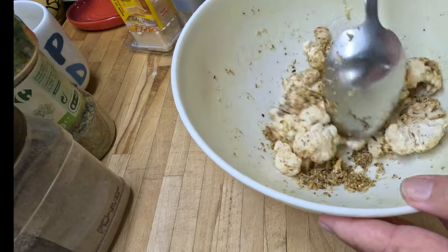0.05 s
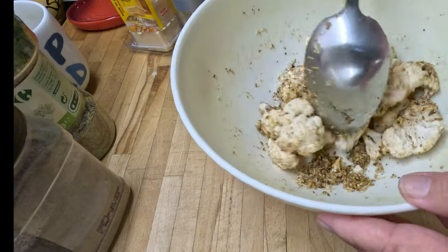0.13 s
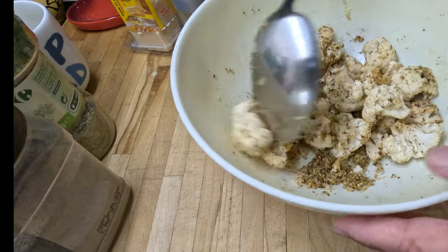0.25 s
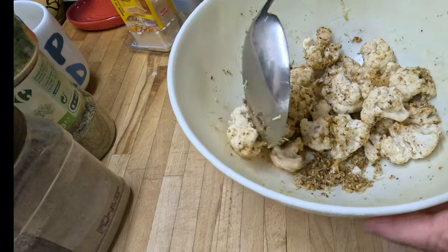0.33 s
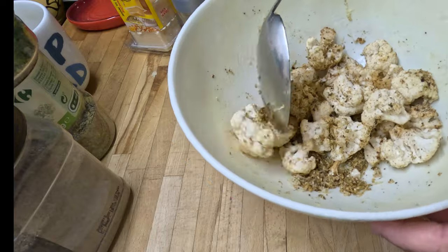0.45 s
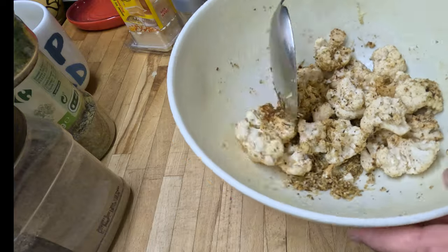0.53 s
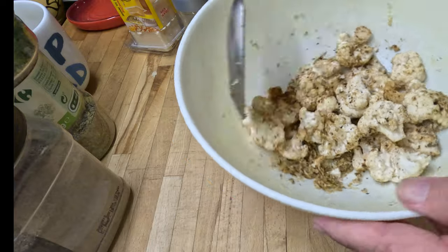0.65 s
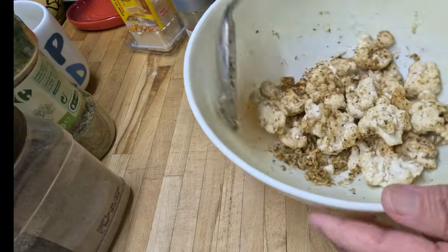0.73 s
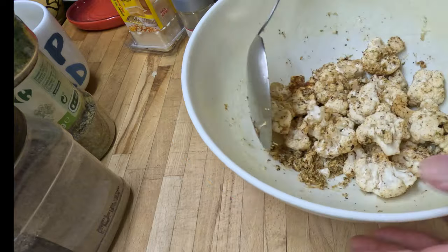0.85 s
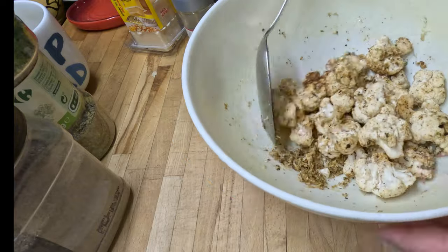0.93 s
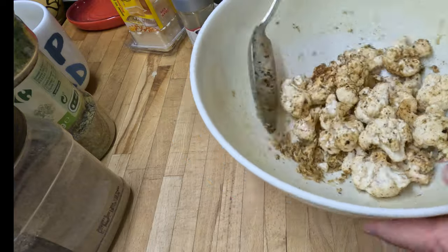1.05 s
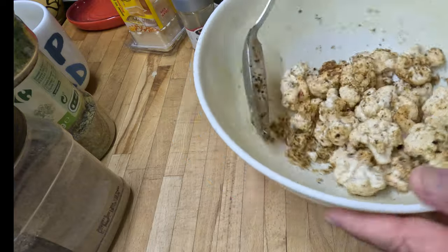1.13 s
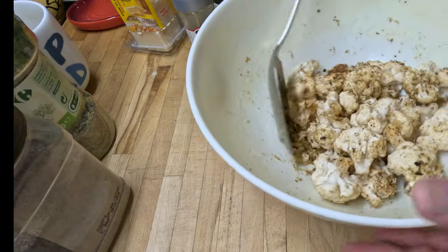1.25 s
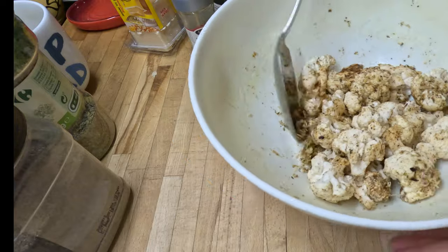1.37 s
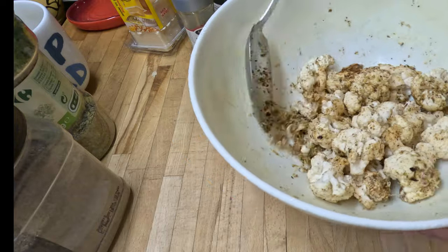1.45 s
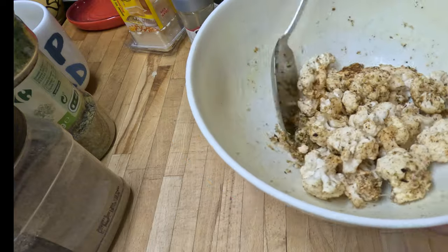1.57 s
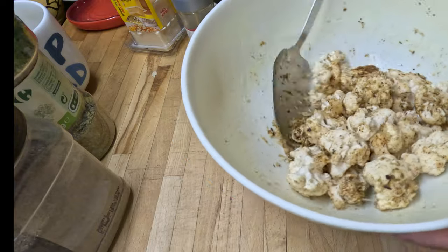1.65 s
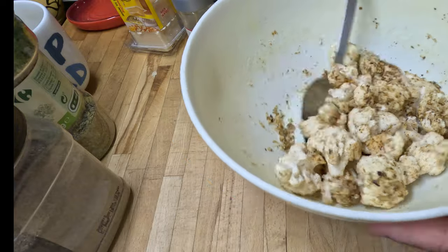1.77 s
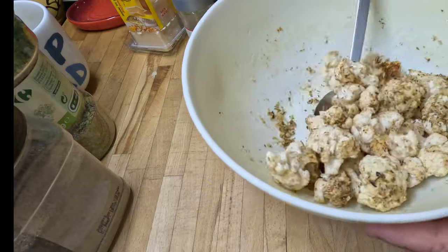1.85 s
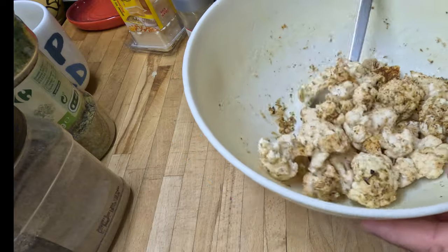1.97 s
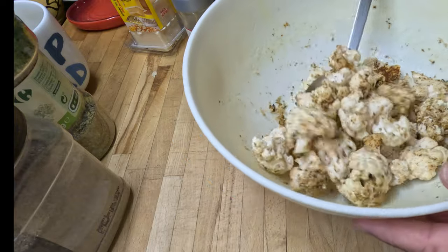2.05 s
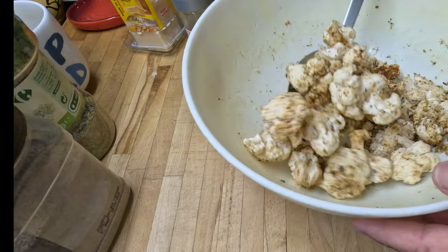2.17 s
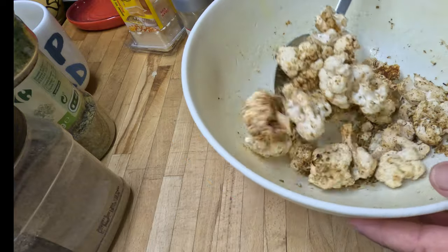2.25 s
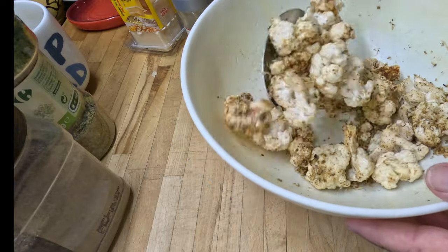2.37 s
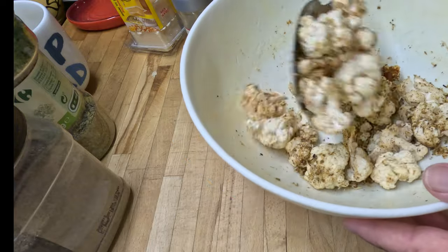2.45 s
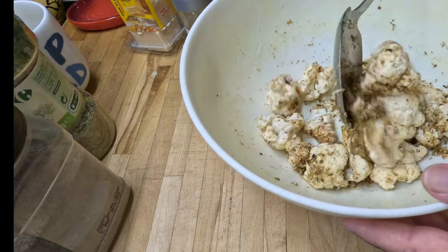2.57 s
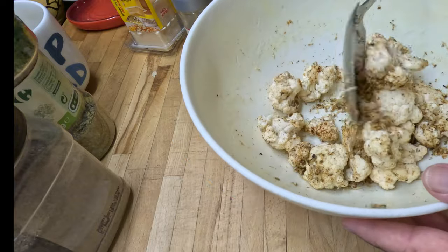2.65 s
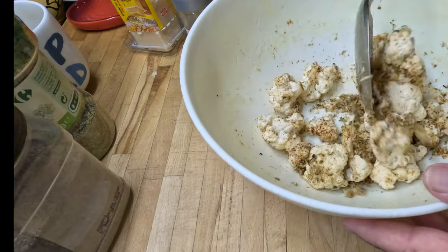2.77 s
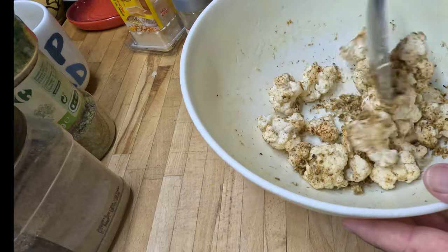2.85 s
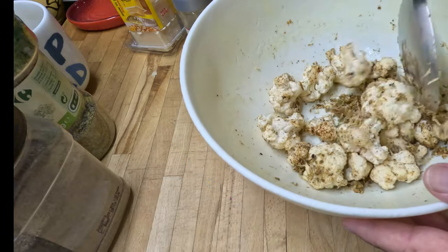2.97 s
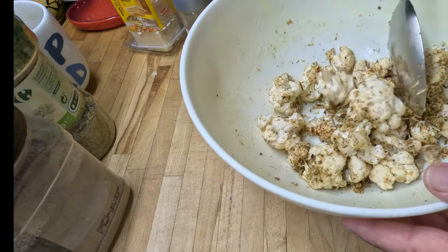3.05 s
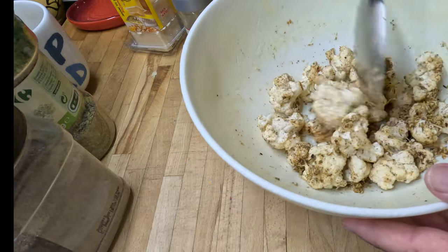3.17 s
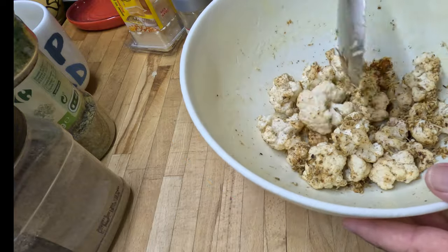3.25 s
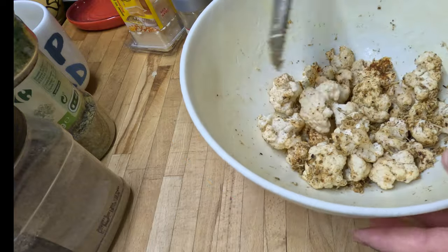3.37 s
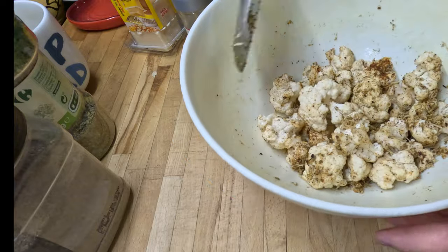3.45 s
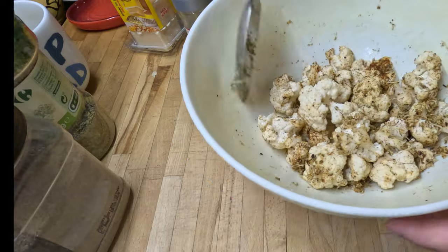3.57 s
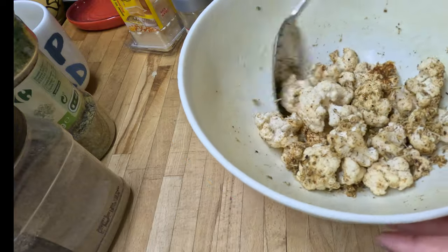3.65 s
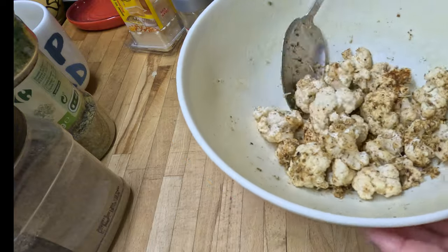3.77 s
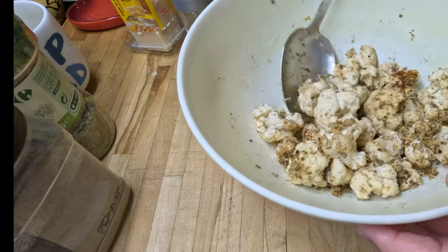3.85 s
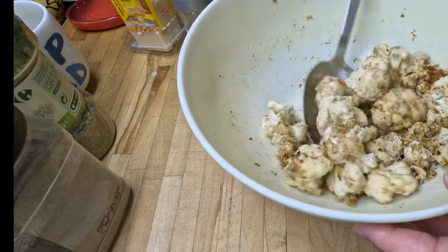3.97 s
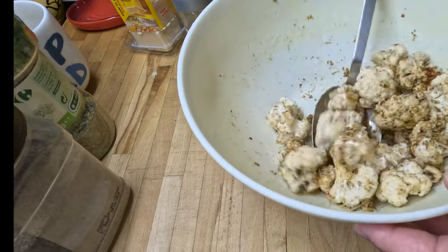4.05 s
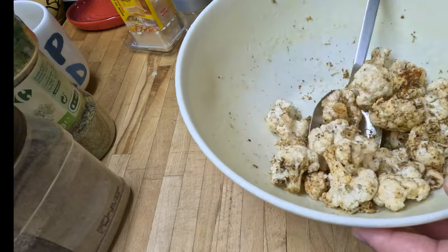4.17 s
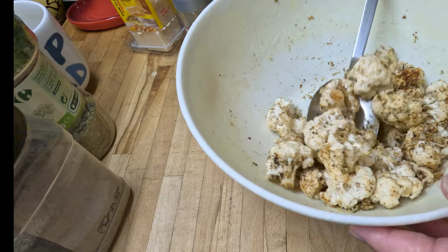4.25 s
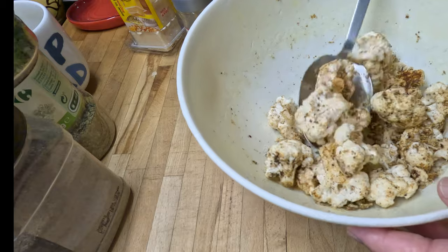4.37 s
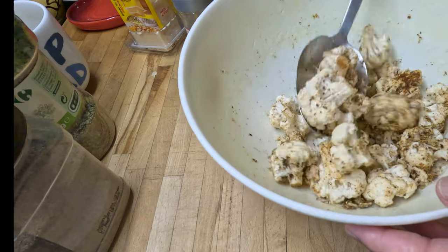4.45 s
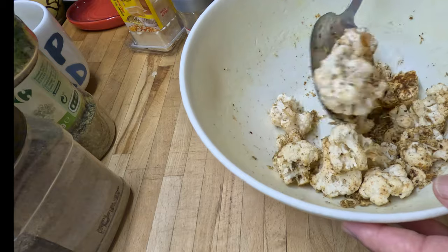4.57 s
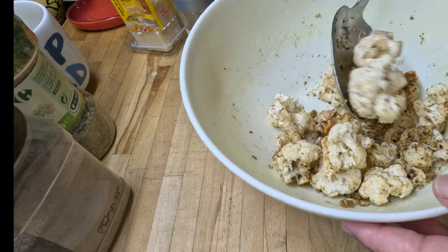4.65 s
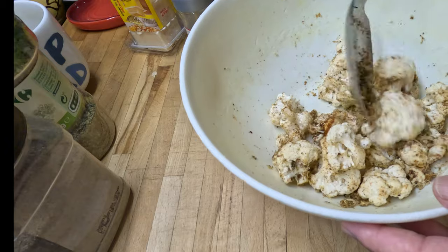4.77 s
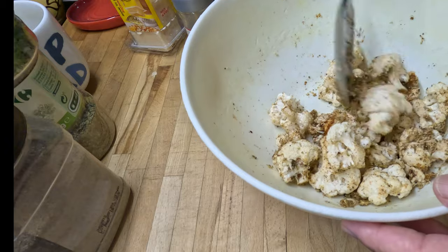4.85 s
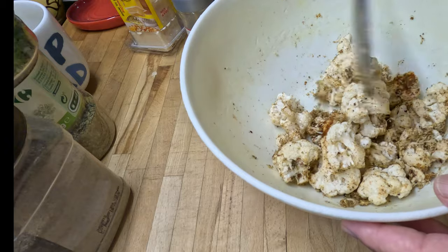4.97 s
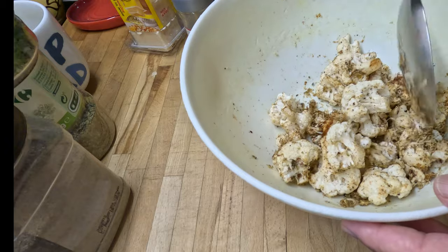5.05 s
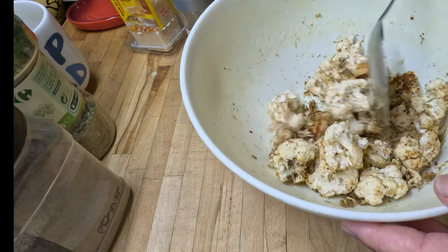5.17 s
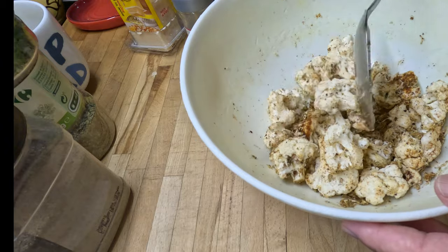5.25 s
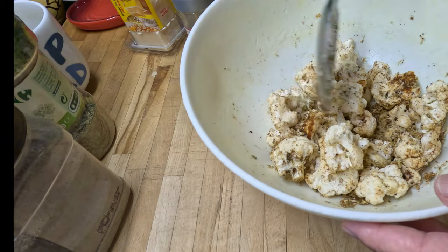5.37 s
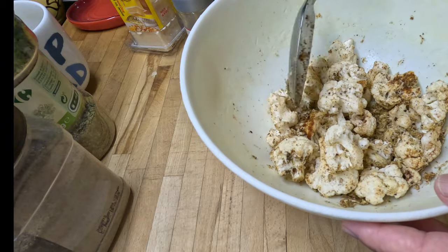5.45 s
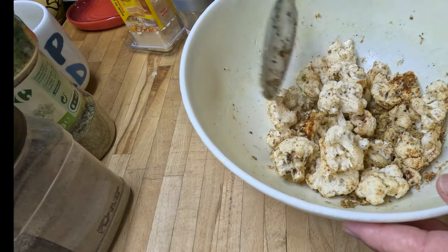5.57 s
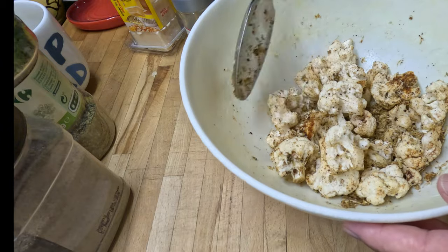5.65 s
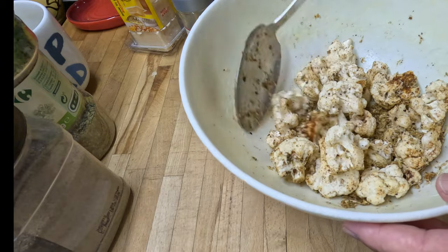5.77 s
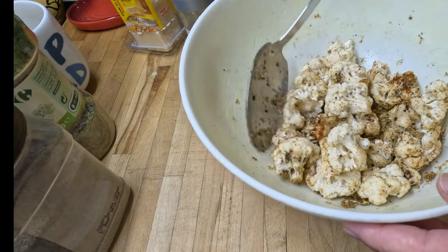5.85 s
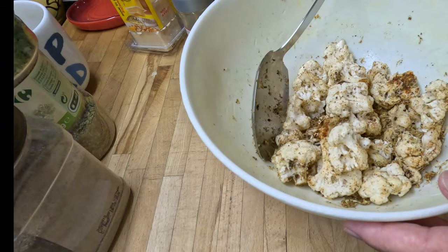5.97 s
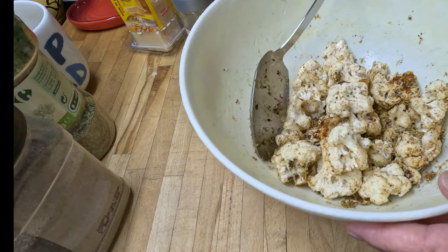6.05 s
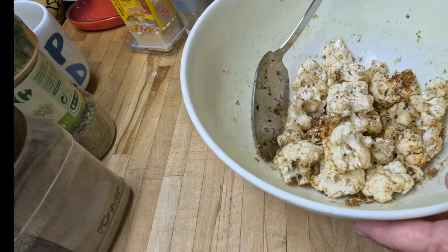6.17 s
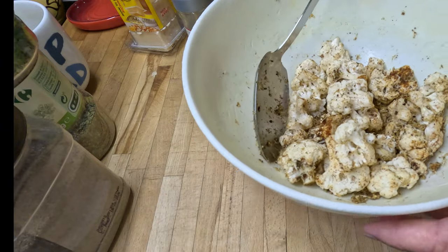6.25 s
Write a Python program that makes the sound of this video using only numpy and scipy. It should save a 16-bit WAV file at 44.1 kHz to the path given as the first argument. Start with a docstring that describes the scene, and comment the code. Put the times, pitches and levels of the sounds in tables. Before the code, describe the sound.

A metal spoon scrapes and knocks in a ceramic bowl, tossing crumb-coated florets that land with soft thuds.

```python
"""A quiet kitchen: a metal spoon tosses crumb-coated florets in a thick bowl that a hand steadies on a
wooden counter. Over a low hush, the bowl's rocking foot rumbles in the counter and florets thud down.
Grit under the spoon's edge scratches and rings the damped wall, crumbs crack, and spoon and florets
knock on the bowl. A short, dull room tail follows the scratches, cracks and knocks."""
import sys
import numpy as np
from scipy import signal
from scipy.fft import rfft, irfft
from scipy.io import wavfile
from scipy.ndimage import uniform_filter1d

SR = 44100
rng = np.random.default_rng(int(sys.argv[2]) if len(sys.argv) > 2 else 0)


def store_pcm(level_fs):
    """Save levels as 16-bit WAV."""
    pcm = np.round(np.clip(level_fs, -1, 1) * 32767).astype(np.int16)
    wavfile.write(sys.argv[1], SR, np.atleast_2d(pcm).T)


N = 278667


def undb(db):
    return 10 ** (np.asarray(db) / 20)


def unit_rms(x):
    return x / np.sqrt(np.mean(x ** 2))


def unit_peak(x):
    return x / np.abs(x).max()


def band(x, lo_hz, hi_hz):
    return signal.sosfilt(signal.butter(2, [lo_hz, hi_hz], "band", fs=SR, output="sos"), x)


def eq(x, curve):
    """Shape the tone by (f/Hz, gain/dB) points joined on a log axis."""
    hz, db = np.transpose(curve)
    bins_hz = np.arange(N // 2 + 1) * SR / N
    return irfft(rfft(x) * undb(np.interp(np.log(bins_hz + 1), np.log(hz), db)), N)


def wander(rate_hz):
    """Slewed random modulation with a spread near 1."""
    hold = int(SR / rate_hz)
    return uniform_filter1d(np.repeat(rng.standard_normal(N // hold + 1), hold), hold)[:N]


def grains(per_s, spread_db):
    """Random clicks, most small and a few large."""
    hit = rng.random(N) < per_s / SR
    clicks = hit * rng.standard_normal(N)
    return unit_rms(clicks * undb(spread_db * np.minimum(rng.exponential(size=N), 3.0)))


def scatter(modes, spread):
    """One random offset per mode."""
    return spread * rng.standard_normal((len(modes), 1))


def strike(modes, gains=1, detune=1):
    """Sum of decaying sines after one blow."""
    hz, db, t60 = np.transpose(modes)[:, :, None]
    t = np.arange(SR // 4) / SR
    return (gains * undb(db) * np.sin(2 * np.pi * hz * detune * t) * 1000 ** (-t / t60)).sum(axis=0)


def resonate(force, modes, wander_db=0):
    """Drive the modes; as the contact travels, each one's feed drifts by about wander_db."""
    out = sum(signal.fftconvolve(force * undb(wander_db * wander(13)), strike([mode]))[:N]
              for mode in modes)
    return out / np.linalg.norm(strike(modes))


# room tone EQ: f/Hz, gain/dB
HUSH_EQ = [(15, -32), (25, 4), (99, 2.5), (936, -36), (1190, -26.5), (3200, -39), (16000, -55)]
def kitchen_hush():
    """A steady, bass-heavy bed of noise."""
    return undb(-60.5) * unit_rms(eq(rng.standard_normal(N), HUSH_EQ))


def room_tail(x, t60_s=0.27, wet_db=-14):
    """The kitchen's short, dull reverb, after a 4 ms pre-delay."""
    t = np.arange(SR // 2) / SR
    dull_noise = signal.lfilter([1], [1, -.6], rng.standard_normal(len(t)))
    tail = dull_noise * 1000 ** (-t / t60_s) * (t > .004)
    return undb(wet_db) * signal.fftconvolve(x, tail / np.linalg.norm(tail))[:N]


# modes of the wooden counter top: f/Hz, level/dB, t60/s
COUNTER_MODES = [(38.5, -7.5, 0.019), (79.1, -1.5, 0.16), (115.5, 2.5, 0.13), (176, -16, 0.13)]
# level automation for food shifting in the bowl: t/s, counter rumble/dB, crumb rustle/dB
FOOD_SHIFTS = [(0.0, -53.5, -66), (0.44, -54.5, -68.5), (0.86, -60.5, -83), (1.14, -50.5, -74),
               (1.57, -56, -85), (1.85, -56.5, -61), (2.07, -59, -65.5), (2.39, -67, -71),
               (2.72, -55.5, -65.5), (3.598, -65, -74.5), (3.85, -57, -58), (4.4, -59, -71.5),
               (5.17, -61.5, -68), (5.25, -69, -73), (5.43, -53.5, -60.5), (5.559, -73, -99),
               (5.83, -68, -81.5), (5.99, -46, -64), (6.31, -68.5, -76.5)]
def counter_rumble():
    """The bowl's foot rocks on the counter: many soft, slow pushes."""
    times, rumble_db, _ = np.transpose(FOOD_SHIFTS)
    level_db = np.interp(np.arange(N) / SR, times, rumble_db)
    pushes = uniform_filter1d(grains(per_s=430, spread_db=4.0), SR // 400)
    return undb(level_db + 5.5) * unit_rms(resonate(pushes, COUNTER_MODES))


# low bending modes of the bowl's wall, damped by hand and food: f/Hz, level/dB, t60/s
WALL_MODES = [(199, -3, 0.04), (315.5, 2, 0.08), (391.8, 7, 0.04), (525, -9, 0.089), (588, -11, 0.1),
              (699, -18, 0.13)]
def wall_drone(db):
    """The sliding edge judders and keeps the low modes going; food damps them as the push ends."""
    judder = grains(per_s=3000, spread_db=0.64) * undb(db / 2)
    drone = resonate(judder, WALL_MODES[1:], wander_db=2.5)
    damping = undb(db / 2 - 2.0)  # the other half of the envelope chokes the tail
    return damping * band(band(drone, 270, 3300), 250, 3800)


# florets landing and the bowl jolting: t/s, wall thud/dB, counter thump/dB
LANDINGS = [(0.181, -40, -44.5), (0.419, -33.5, -31.5), (0.883, -56, -30.5), (1.607, -20, -34),
            (1.907, -25, -33), (2.262, -39.5, -48), (2.405, -38, -47.5), (2.514, -37.5, -34.5),
            (2.687, -54, -40.5), (2.707, -39, -37), (2.729, -34, -37), (2.852, -39, -56), (3.062, -69, -64),
            (3.102, -44, -38.5), (3.213, -51, -44.5), (3.641, -46.5, -31.5), (4.269, -39.5, -40.5),
            (4.615, -45.5, -36), (4.919, -51, -42.5), (4.944, -43, -32), (5.29, -58, -40.5),
            (5.387, -45.5, -47.5), (5.857, -19.5, -30)]
def floret_thuds():
    """Soft food gives a short, low push that thuds the wall and a longer roll that thumps the counter."""
    out, t = np.zeros(N + SR), np.arange(SR // 4) / SR
    for start, wall_db, counter_db in LANDINGS:
        roll = rng.standard_normal(len(t)) * np.exp(-t / 0.045)
        push = band(roll * np.exp(-t / 0.018), 170, 310)
        wall = strike(WALL_MODES, detune=1 + scatter(WALL_MODES, 0.019))
        thud = unit_peak(signal.fftconvolve(push, wall)[:len(t)])
        thump = unit_peak(signal.fftconvolve(roll, strike(COUNTER_MODES))[:len(t)])
        i = int(start * SR)
        out[i:i + len(t)] += undb(wall_db - 7.0) * thud + undb(counter_db + 2.0) * thump
    return out[:N]


# crumbs and crust cracking aloud: t/s, peak/dB
CRUST_CRACKS = [(0.8828, -33.5), (1.6018, -34), (1.6412, -27), (1.6954, -41), (1.936, -39), (2.3795, -58),
                (2.735, -54), (2.818, -55), (3.2206, -48.5), (3.402, -59), (3.441, -55), (3.699, -44.5),
                (3.7825, -33.5), (4.84, -67), (5.266, -47.5), (5.424, -64), (5.907, -41)]
def crust_cracks(decay_s=0.0049, air_db=-16.5):
    """A crumb splits in a bright burst a few milliseconds long."""
    out, t = np.zeros(N + SR), np.arange(1024) / SR
    for start, db in CRUST_CRACKS:
        burst = rng.standard_normal(len(t)) * np.exp(-t / decay_s)
        i = int(start * SR)
        out[i:i + len(t)] += undb(db) * unit_peak(band(burst, 1930, 5580) + undb(air_db) * burst)
    return out[:N]


def crumb_clicks():
    """Lone crumbs of eight sizes, each size clicking at its own pitch."""
    return unit_rms(sum(band(grains(per_s=77, spread_db=3.9), hz / 1.1, hz * 1.127)
                        for hz in np.geomspace(1400, 7000, num=8)))


# tone of a single grain of grit: f/Hz, gain/dB
GRIT_EQ = [(300, -15.5), (800, -5.5), (1400, -4), (2200, -5.5), (3500, -11.5), (6000, -22.5), (10000, -37)]
# high modes of wall and spoon: f/Hz, level/dB, t60/s
RING_MODES = [(1053, -3.5, 0.06), (1114, -2.5, 0.031), (1549, -5.5, 0.092), (1820, -7, 0.065),
              (2170, -4.5, 0.024), (2420, -11.5, 0.037), (2800, -11, 0.026), (2830, -10.5, 0.044),
              (3720, -14.5, 0.037), (4180, -4, 0.053), (7250, -21, .08)]
def grit_scratch(db, sizzle_db):
    """Crumbs slip under the edge in patches; pressing hard lets metal touch and ring the wall."""
    moist_rustle = grains(per_s=6000, spread_db=0.73)
    force = (moist_rustle + undb(-10) * crumb_clicks()) * undb(2.83 * wander(40))
    sizzle = unit_rms(band(force * rng.standard_normal(N), 3400, 8000)) * undb(sizzle_db)
    grit = undb(-2.5) * unit_rms(eq(force, GRIT_EQ))
    touch_db = np.clip(-7.0 + 3.7 * (db + 34.5), -30, 0.5)
    ring = undb(touch_db) * resonate(force, RING_MODES[2:-1], wander_db=1.7)
    return (grit + ring) * undb(db) + sizzle


def bowl_notches(x, q=4.65, depth=0.98):
    """Scoop out two narrow bands from the bowl's sound."""
    for hz in (830, 1367):
        notched = signal.lfilter(*signal.iirnotch(hz, q, SR), x)
        x = x + depth * (notched - x)
    return x


# swells of the spoon's edge through the crumbs:
# deepest t/s, dig-in/s, ease-off/s, grit/dB, wall drone re grit/dB, oil sizzle re grit/dB
SPOON_STROKES = [(0.192, 0.1, 0.092, -48.5, -7.5, -32), (0.444, 0.11, 0.11, -62.5, 7, -14),
                 (.8, 0.36, 0.33, -52, -2.5, -61.5), (0.91, 0.045, 0.12, -45.5, 12, -19.5),
                 (1.106, 0.17, 0.057, -50.5, 5.5, -44), (1.25, 0.039, 0.13, -44.5, -11, -22),
                 (1.34, 0.25, 0.2, -47, 6, -41), (1.412, 0.031, 0.06, -44.5, 17, -32.5),
                 (1.67, 0.065, 0.1, -37.5, 10.5, -43), (1.81, 0.091, 0.08, -45.5, 0.5, -44),
                 (1.919, 0.082, 0.12, -40, -0.5, -30.5), (2.019, 0.11, 0.078, -58.5, 16, -32),
                 (2.323, 0.21, 0.16, -62, -2, -44), (2.66, 0.11, 0.07, -59.5, -5, -35),
                 (3.26, 0.12, 0.14, -59, 4.5, -23.5), (3.42, 0.02, 0.096, -60.5, 0.5, -20),
                 (3.697, 0.014, 0.035, -48.5, 12, -1.5), (3.809, 0.07, 0.027, -33, 7.5, -30.5),
                 (3.92, 0.36, 0.11, -54.5, 12, -53), (4.12, 0.19, 0.13, -48.5, -2.5, -35),
                 (4.16, 0.038, 0.11, -42.5, 1, -29), (4.62, 1, 0.17, -62, 2.5, -38),
                 (4.83, 0.12, 0.061, -59, 3.5, -37), (5.3, 0.067, 0.2, -59.5, -2.5, -39),
                 (5.869, 0.028, 0.18, -49.5, 15.5, -52), (6.02, 0.2, 0.051, -53.5, 5, -50)]
def spoon_strokes(drop_db=20, roundness=1.365):
    """Each stroke digs in and eases off, swelling scratch and drone above the rustle of shifting food."""
    t = np.arange(0, N, 64) / SR
    times, _, rustle_db = np.transpose(FOOD_SHIFTS)
    rustle = undb(np.interp(t, times, rustle_db)) ** 2
    powers = [rustle * undb(offset_db) ** 2 for offset_db in (0, -7.5, -33.5)]  # grit, drone, sizzle
    for deepest, dig, ease, db, wall_db, oil_db in SPOON_STROKES:
        distance = np.where(t < deepest, (deepest - t) / dig, (t - deepest) / ease)
        swell = undb(db - drop_db * distance ** roundness) ** 2
        for power, offset_db in zip(powers, (0, wall_db, oil_db)):
            power += swell * undb(offset_db) ** 2
    grit_db, drone_db, sizzle_db = [np.interp(np.arange(N) / SR, t, 10 * np.log10(p)) for p in powers]
    return bowl_notches(grit_scratch(grit_db, sizzle_db) + wall_drone(drone_db))


# spoon and florets hitting the wall: t/s, level/dB, tick f/Hz, boom trim/dB, contact/ms
WALL_HITS = [(0.049, -48.5, 2160, -8.5, 4.6), (0.323, -45, 940, -13, 2.6), (0.439, -44, 2640, -28, 6.6),
             (0.883, -30.5, 2480, -3.5, 6.5), (1.241, -47, 2440, 8, 3), (1.408, -35.5, 1630, -23, 9.4),
             (1.601, -30, 1890, 2.5, 6.7), (1.642, -25, 1000, -43.5, 1.8), (1.674, -23, 930, -19, 3.8),
             (1.89, -31.5, 913, -36, 5.5), (1.926, -25, 1900, -40, 4.5), (1.976, -18.5, 1200, -21, 2.5),
             (2.852, -49, 1800, -7.5, 2.9), (3.061, -48.5, 1650, -2, 1.2), (3.502, -49.5, 2160, -43.5, 2.1),
             (3.64, -32, 1000, -11, 6), (3.695, -34, 2450, -2.5, 13.5), (3.803, -26, 1550, -8.5, 16.7),
             (4.039, -33.5, 1030, -29, 0.51), (4.152, -32, 1540, -20, 9.1), (4.156, -26, 965, -18, 1.9),
             (4.235, -26, 1060, -19.5, 2), (4.428, -44.5, 1620, -14, 2.9), (4.613, -43.5, 1090, -6.5, 2.2),
             (4.788, -48, 1160, -4, 4.3), (4.829, -41.5, 1480, -39, 2.7), (4.96, -49.5, 1164, -4, 2.9),
             (5.266, -55.5, 2165, -13, 2.2), (5.854, -26, 1940, -4, 7.3), (6.057, -24, 896, -19.5, 1.25),
             (6.182, -55.5, 2240, -18, 2.7)]
def bowl_knocks(log_width=0.4):
    """Each contact is a short pitched rattle: a tick, a high ring and a low boom from the wall."""
    out, t = np.zeros(N + SR), np.arange(SR // 4) / SR
    ring_hz = np.array(RING_MODES)[:, :1]
    for start, db, hz, boom_db, contact_ms in WALL_HITS:
        rattle = rng.standard_normal(len(t)) * np.exp(-t * 1000 / contact_ms)
        rattle[0] += 6.5  # first touch
        air = undb(-48.5) * (hz / 2000) ** 2 * rattle
        tick = unit_peak(band(band(rattle, hz / 1.67, hz * 1.516), 220, 4200)) + air
        # modes near the contact's pitch take most of the blow
        gains = np.exp(-(np.log(ring_hz / hz) / log_width) ** 2) * undb(scatter(RING_MODES, 1))
        ring = strike(RING_MODES, gains, detune=1 + scatter(RING_MODES, 0.006))
        ring = unit_peak(signal.fftconvolve(rattle, ring)[:len(t)])
        boom = strike(WALL_MODES, undb(scatter(WALL_MODES, 3.4)), detune=1 + scatter(WALL_MODES, 0.043))
        boom = unit_peak(boom * (1 - np.exp(-t / 0.0035)))  # soft attack
        # a longer contact feeds the ring more and the tick less
        tick_gain = undb(3.5) * min(1, 4 / contact_ms)
        ring_gain = undb(-11.5) * contact_ms / 3
        i = int(start * SR)
        out[i:i + len(t)] += undb(db) * (tick_gain * tick + ring_gain * ring + undb(boom_db + 9) * boom)
    return out[:N]


def scene():
    """Centred mix: the bowl feeds the room tail; thuds, rumble and hush stay dry."""
    bowl = spoon_strokes() + bowl_knocks() + crust_cracks()
    hush = kitchen_hush()
    return np.tile(bowl + room_tail(bowl) + floret_thuds() + counter_rumble() + hush, (2, 1))


def record(dry, spread_above_hz=11400, cutoff_hz=15800):
    """The highest treble flickers between left and right, then a steep low-pass trims the top."""
    treble = signal.sosfilt(signal.butter(8, spread_above_hz, "high", fs=SR, output="sos"), dry[0])
    side = treble * (0.18 + undb(3.0) * wander(970))
    stereo = dry + np.array([[1], [-1]]) * side
    return signal.sosfilt(signal.ellip(10, .2, 70, cutoff_hz, fs=SR, output="sos"), stereo)


dry = scene()
out = record(dry)
store_pcm(out)
```